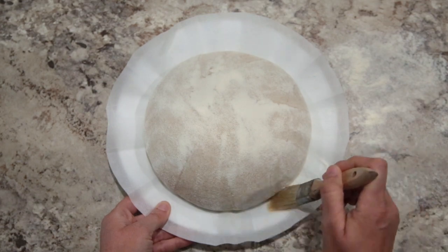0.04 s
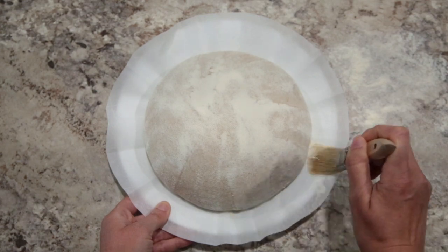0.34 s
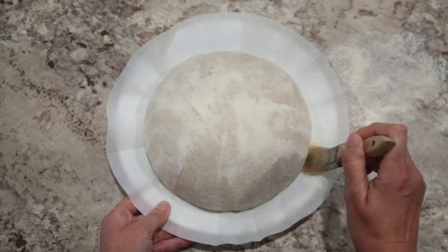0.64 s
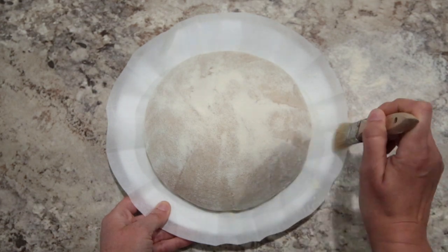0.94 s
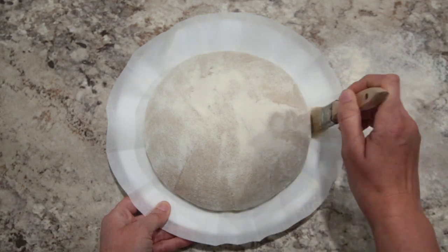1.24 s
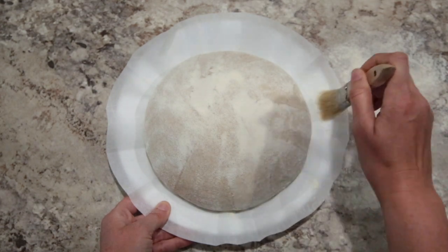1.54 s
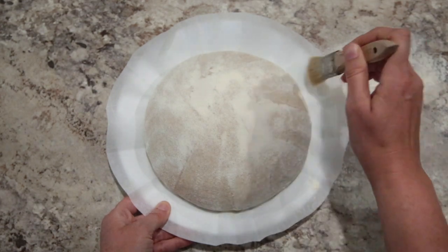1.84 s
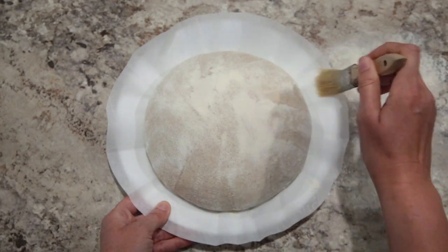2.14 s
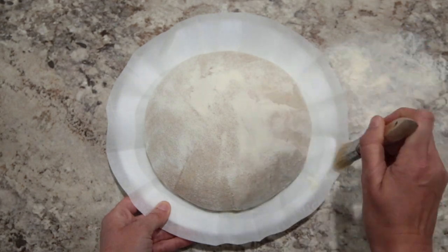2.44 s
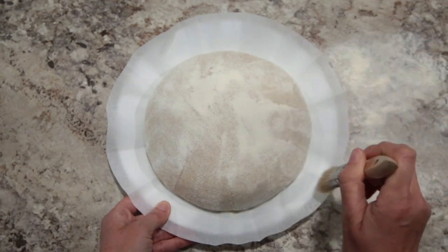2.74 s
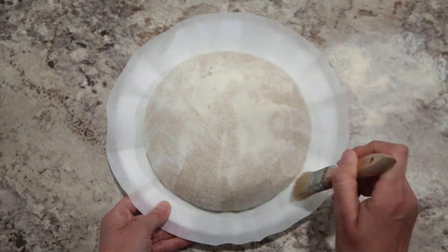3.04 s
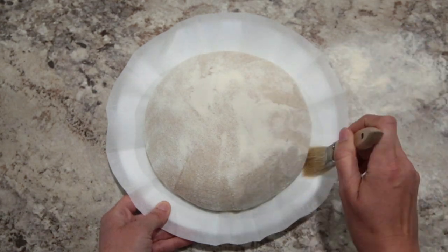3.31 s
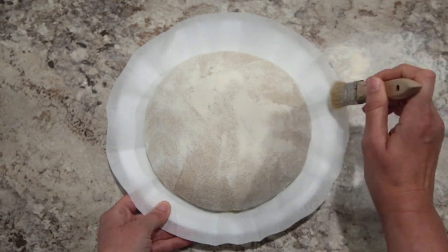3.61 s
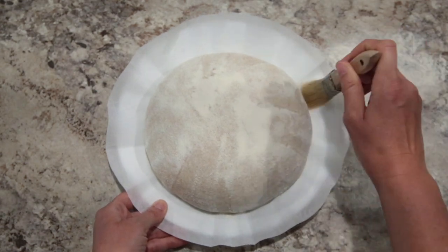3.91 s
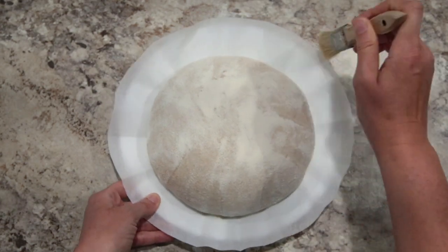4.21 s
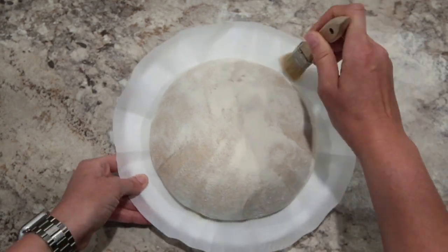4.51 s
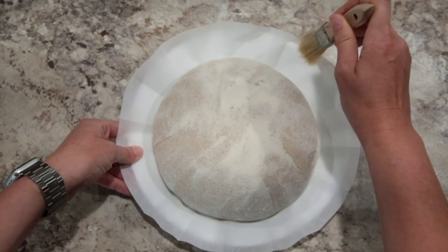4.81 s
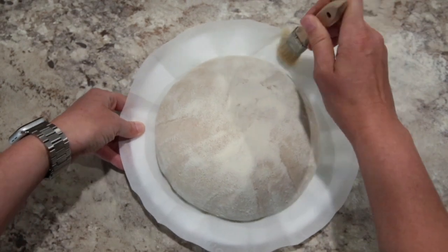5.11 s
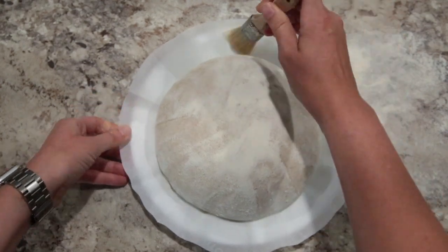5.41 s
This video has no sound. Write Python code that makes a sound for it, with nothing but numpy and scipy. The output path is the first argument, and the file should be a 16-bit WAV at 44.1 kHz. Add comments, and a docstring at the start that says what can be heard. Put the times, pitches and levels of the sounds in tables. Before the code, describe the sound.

A pastry brush sweeps loose flour across parchment paper on a kitchen counter, about five short, scratchy strokes a second. The bristles hiss and the stiff sheet rattles and ticks. Near the end the strokes grow a little louder as the paper is turned with a soft slide and rustle, and a deep rumble swells. It is heard close up in a small, hard room with a faint appliance hum.

```python
"""A pastry brush sweeps loose flour off a sheet of parchment on a kitchen counter, close up, in mono.
In each stroke the bristles land, drag and flick away: tiny slips that hiss and rattle the stiff paper.
The sheet ticks against the counter and is turned by hand near the end.
Around it: a small hard room, an appliance hum and a deep rumble that swells late."""
import sys
import numpy as np
from scipy import signal
from scipy.fft import rfft, irfft
from scipy.io import wavfile

SR = 44100
rng = np.random.default_rng(int(sys.argv[2]) if len(sys.argv) > 2 else 0)


def digitize_waveform(pressure):
    """Quantize a signal to 16-bit integers and store it at the path in sys.argv[1].

    Rows of a 2-D input are taken as channels; values are limited to [-1, 1].
    """
    field = np.atleast_2d(pressure).T
    bounded = np.clip(field, -1, 1)
    quanta = np.round(bounded * 32767).astype(np.int16)
    wavfile.write(sys.argv[1], SR, quanta)


N = 245195
SIZE = 4096  # filter length, samples
TIME_S = np.arange(N) / SR
FREQ_HZ = np.fft.rfftfreq(SIZE, 1 / SR)

# brush strokes: touch_s, attack_s, touch_to_flick_s, land_hiss_db, drag_hiss_db, flick_hiss_db,
# land_paper_vs_hiss_db, flick_paper_vs_hiss_db, bright_db
STROKES = [(-0.11, .01, .112, -36, -49.5, -37, -2, 0.5, -2.5),
           (0.018, 0.026, 0.11, -30, -31, -40, -0.5, 8.5, -2.5),
           (0.148, 0.0048, .332, -43.5, -43.5, -31, 9, 0, 0),
           (0.642, 0.024, .15, -31, -42.5, -50.5, -3, 8.5, 2),
           (0.880, 0.0067, .128, -28.5, -40.5, -48, -7.5, 8.5, -1),
           (1.094, .012, 0.13, -28.5, -44.5, -43.5, -3.5, 8, -1.5),
           (1.306, 0.018, 0.12, -28.5, -42.5, -39, -8.5, 4.5, -1),
           (1.525, 0.0095, .12, -27.5, -41.5, -38, -1, 1.5, -3),
           (1.736, 0.015, .12, -29.5, -36.5, -38.5, -3, 7.5, 0.5),
           (1.942, 0.017, .121, -27.5, -37, -34.5, -7.5, 7, -0.5),
           (2.129, 0.02, 0.1, -31, -37, -33, -3.5, 6, -0.5), (2.396, 0.022, 0.12, -30, -45, -40, 2.5, 3, 0),
           (2.645, 0.0079, 0.1, -27, -44, -34.5, -6, 10, 2.5),
           (2.904, 0.015, 0.11, -30.5, -40.5, -39, -4.5, 12, 4.5),
           (3.145, 0.008, 0.11, -31.5, -38.5, -40, 1, 5.5, 2),
           (3.354, 0.012, 0.099, -27, -38.5, -39, -3, 2, 1.5),
           (3.537, 0.018, 0.13, -25, -40.5, -49, -8.5, 6, 0),
           (3.734, .011, 0.13, -26.5, -39, -41, -6.5, 5.5, -3),
           (3.920, 0.019, 0.14, -25.5, -36.5, -39, -8, 3, -1.5),
           (4.124, 0.021, 0.11, -27.5, -35, -34, -4.5, 7.5, -1.5),
           (4.334, .018, 0.12, -27.5, -36, -36, -1.5, 9.5, -4),
           (4.558, 0.023, 0.13, -23.5, -35, -36, -7.5, -0.5, -5),
           (4.763, 0.018, 0.13, -24.5, -36.5, -36.5, -7, 3.5, -0.5),
           (4.960, 0.023, 0.13, -23.5, -32.5, -32, -5, 1, -2.5),
           (5.156, .022, .116, -25.5, -34, -35, -3.5, 8.5, -3),
           (5.466, .015, 0.099, -29.5, -36.5, -29, 0.5, 6, -0.5)]


def brush(paper, crackle_db=-7, tuft_s=0.0013, flutter_db=3.0):
    """Bristles on flour: coarse slips shake the sheet, fine ones hiss, a few crackle."""
    # spectra of the hiss, its top octave and a tip flicking a grain: freq_hz, gain_db
    hiss_points = [(300, -24.5), (1000, -10), (2000, -10), (3200, -9), (4200, 0.5), (5000, -1), (6000, -3),
                   (8400, 1), (9500, -4), (12000, -14)]
    top_points = [(4000, -63), (7500, -38), (9200, -0.5), (10500, -1), (12500, 3), (16000, -2.5)]
    crackle_points = [(800, -36), (2000, 3), (4500, 2), (9000, -5), (16000, 8)]
    hiss, top, crackle = shape(hiss_points), shape(top_points), shape(crackle_points)
    out = np.zeros(N)
    for t, push, paper_db, hiss_db, top_db in [*stroke_pushes(), *rustle_pushes()]:
        tufts = wander((t - t[0]) / tuft_s)  # bristles let go in tufts
        force = push * unit(undb(flutter_db * tufts))
        coarse = slips(len(t), rate_hz=2600, spread_db=5)
        fine = slips(len(t), rate_hz=15000, spread_db=4)
        finest = slips(len(t), rate_hz=15000, spread_db=4)
        sparse = slips(len(t), rate_hz=300, spread_db=4)
        spot = spot_colour(depth_db=1.6)
        layers = [(coarse, paper + spot / 2, paper_db),
                  (fine, hiss, hiss_db),
                  (finest, top, hiss_db + top_db),
                  (sparse, crackle, hiss_db + top_db / 2 + crackle_db)]
        for clicks, colour, level_db in layers:
            add(out, t[0], undb(level_db) * signal.fftconvolve(force * clicks, response(colour + spot)))
    return out


def stroke_pushes(land_top_db=-4.5, drag_top_db=-0.5, flick_top_db=4, drag_after_s=0.075, bend_db=1):
    """Four pushes a stroke; yields times_s, strength, paper_db, hiss_db, top_vs_hiss_db."""
    for (touch_s, attack_s, length_s, land_db, drag_db, flick_db,
         land_paper_db, flick_paper_db, bright_db) in STROKES:
        # bite: first tips meet the sheet, weaker for a slow attack
        bite_db = land_db - 6.5 - 450 * attack_s
        t, push = swell(touch_s + 0.0032, rise_s=0.0016, hold_s=0, fall_s=0.0053)
        yield t, push, bite_db - 11.5, bite_db, land_top_db + bright_db
        # landing: tips hit and splay, dark hiss
        t, push = swell(touch_s + attack_s, rise_s=attack_s / 2, hold_s=0.0038, fall_s=0.015)
        yield t, push * (t > touch_s), land_db + land_paper_db, land_db, land_top_db + bright_db
        # drag: bristles glide, louder as they bend; the sheet barely stirs
        glide_s = max(length_s - drag_after_s, 0)
        t, push = swell(touch_s + drag_after_s, rise_s=0.022, hold_s=glide_s, fall_s=0.013)
        progress = np.clip((t - touch_s) / length_s, 0, 1)
        bend = undb(bend_db * (progress ** 2 - 0.5))
        yield t, push * bend, drag_db - 7, drag_db, drag_top_db + bright_db
        # flick: bristles spring free; times halve per 17.5 dB more rattle
        rattle_db = flick_db + flick_paper_db
        stretch = 2 ** ((-32 - rattle_db) / 17.5)
        t, push = swell(touch_s + length_s, rise_s=0.016 * stretch, hold_s=0, fall_s=0.013 * stretch)
        yield t, push, rattle_db, flick_db, flick_top_db + bright_db


def slips(samples, rate_hz, spread_db):
    """Bristles catch and let go: random clicks of uneven size, rms 1."""
    happens = rng.random(samples) < rate_hz / SR
    size = undb(spread_db * np.clip(rng.standard_normal(samples), -2, 2))
    return unit(happens * size * rng.choice([-1, 1], samples) + 1e-9)


def paper_spectrum():
    """What the rubbed or struck sheet radiates, in dB."""
    # broad colour: freq_hz, gain_db
    paper_points = [(100, -13), (350, -17.5), (550, -15), (800, -11), (1150, -6.5), (1600, -1.5),
                    (2050, 3.5), (2400, -4), (3100, -11), (4200, -14), (6000, -20), (12000, -34)]
    # resonances: centre_hz, width_hz, boost_db
    modes = [(1708, 230, 3), (1870, 640, -0.5), (2510, 42, 2), (2815, 150, 4), (4000, 148, 3.5)]
    peaks = sum(db / (1 + (2 * (FREQ_HZ - hz) / width_hz) ** 2) for hz, width_hz, db in modes)
    return shape(paper_points) + peaks


def spot_colour(depth_db, step_hz=600):
    """Each spot on the sheet has its own random spectral ripple."""
    return depth_db * 1.23 * wander(FREQ_HZ / step_hz)  # 1.23 brings the spread near 1


def ticks(paper, knock_gain_db=20.5, snap_gain_db=22, buckle_s=0.0004, chatter_s=0.0048, thin_hz=600):
    """A crease gives way and chatters on: a knock through the sheet plus a bright snap."""
    # buckles and slaps on the counter: start_s, knock_db, snap_db
    buckles = [(0.0995, -27, -26), (0.1533, -32, -17.5), (0.1616, -30, -22.5), (0.313, -27.5, -32),
               (0.3357, -28.5, -29.5), (0.3552, -33, -35), (0.4763, -25, -27), (0.5008, -21.5, -22),
               (0.5126, -22, -27), (0.5544, -33, -37), (0.8049, -33, -40), (0.8947, -37, -23.5),
               (1.1737, -32.5, -43), (1.2234, -33, -26.5), (1.2457, -25.5, -35), (1.4972, -41, -50),
               (1.552, -44, -24), (1.677, -24, -45), (1.751, -24, -32), (1.8938, -31, -42),
               (2.0453, -30, -23.5), (2.103, -33, -36), (2.134, -25, -29.5), (2.2533, -16.5, -45),
               (2.2599, -47, -27), (2.421, -25.5, -46), (2.7463, -33.5, -23), (2.7693, -27, -32),
               (2.7779, -21.5, -28.5), (2.7813, -25.5, -48), (3.0313, -26.5, -47), (3.1537, -24.5, -53),
               (3.4399, -17.5, -24), (3.488, -18.5, -27), (3.806, -41, -21.5), (3.8097, -20.5, -51),
               (3.8546, -58, -25.5), (4.1431, -25.5, -52), (4.2282, -33, -17), (4.2693, -23.5, -27),
               (4.3685, -43, -20), (4.4468, -18.5, -28), (4.4637, -25, -46), (4.502, -29, -20.5),
               (4.5486, -27, -49), (4.677, -25, -25.5), (4.712, -27, -29), (4.758, -48, -46),
               (4.8718, -23.5, -31.5), (4.8816, -21.5, -25), (4.9332, -27, -28.5), (5.0816, -35, -21.5),
               (5.1204, -22.5, -25), (5.2228, -19, -34), (5.2537, -21, -20), (5.3057, -29, -31)]
    # crease snap spectrum: freq_hz, gain_db
    snap_points = [(500, -4), (2500, 2.5), (4300, 12), (6500, 3.5), (10000, 1.5), (16000, -1)]
    snap = shape(snap_points)
    # a small patch radiates little bass
    knock = paper - 10 * np.log10(1 + (thin_hz / (FREQ_HZ + thin_hz / 10)) ** 2)
    t = np.arange(SIZE // 4) / SR
    envelope = np.exp(-t / buckle_s) + 0.49 * np.exp(-t / chatter_s)
    out = np.zeros(N)
    for start_s, knock_db, snap_db in [*buckles, *stray_ticks()]:
        spectrum = rfft(rng.choice([-1, 1], len(t)) * envelope, SIZE)
        blow = irfft(spectrum / np.sqrt(np.abs(spectrum) + 1e-9))[:len(t)]  # partly whitened
        spot = spot_colour(depth_db=1.5)
        for colour, level_db in (knock, knock_db + knock_gain_db), (snap, snap_db + snap_gain_db):
            ring = signal.fftconvolve(blow, response(colour + spot))
            add(out, start_s, undb(level_db) * ring / np.linalg.norm(ring))
    return out


def stray_ticks(scatter_s=0.018, scatter_db=3):
    """One faint tick near each flick; yields start_s, knock_db, snap_db."""
    for touch_s, _, length_s, _, _, flick_db, _, flick_paper_db, _ in STROKES:
        late, knock, snap = rng.standard_normal(3)
        yield (touch_s + length_s + scatter_s * late,
               flick_db + flick_paper_db - 8 + scatter_db * knock,
               flick_db - 3 + scatter_db * snap)


def rustle_pushes():
    """The sheet rustles as it is moved; yields the same fields as stroke_pushes."""
    # rustles: full_s, rise_s, hold_s, fall_s, paper_db, hiss_db, top_vs_hiss_db
    rustles = [(0.548, 0.011, 0.0066, 0.0036, -37, -46.5, -10), (4.46, 0.042, 0.82, 0.032, -43, -47, -11),
               (5.121, .008, .005, 0.042, -37, -42, -9), (5.212, 0.0023, .01, 0.0044, -31.5, -34, -4)]
    for full_s, rise_s, hold_s, fall_s, *levels_db in rustles:
        yield (*swell(full_s, rise_s, hold_s, fall_s), *levels_db)


def turning(bump_s=4.3705, bump_hz=245, bump_decay_s=0.00303, bump_db=-23):
    """The sheet shifts on the counter; later the hand bumps it and drags it round."""
    # sliding level: time_s, level_db
    slide_levels = [(0, -54), (.45, -76), (.58, -47.5), (.72, -76), (4.25, -78), (4.45, -49.5), (4.6, -43),
                    (4.8, -46.5), (5.2, -59), (5.35, -55), (5.56, -56)]
    # sliding spectrum: freq_hz, gain_db
    slide_points = [(60, -11), (170, -19), (310, -0.5), (480, -7), (750, -13), (1500, -25), (5000, -67)]
    out = curve(slide_levels) * noise(slide_points)
    t = np.arange(SIZE) / SR
    add(out, bump_s, undb(bump_db) * np.sin(2 * np.pi * bump_hz * t) * np.exp(-t / bump_decay_s))
    return out


def ceiling(x, delay_s=0.00894, echo_db=-16, lowpass_hz=6000):
    """One slap from the ceiling, 1.5 m above the counter, combs the sound."""
    echo = np.zeros(N)
    dull = signal.sosfilt(signal.butter(1, lowpass_hz, fs=SR, output="sos"), x)
    add(echo, delay_s, undb(echo_db) * dull)
    return echo


def room(x, t60_s=0.44, predelay_s=0.0117):
    """Walls and cupboards return a short, duller, diffuse tail."""
    # tail spectrum: freq_hz, gain_vs_direct_db
    tail_points = [(100, -11.5), (1000, -11), (2300, -13), (4500, -10), (9000, -14.5), (16000, -18.5)]
    tail_db = shape(tail_points)
    t = np.arange(SR // 2) / SR
    tail = rng.standard_normal(len(t)) * np.exp(-np.log(1000) * t / t60_s) * (t > predelay_s)
    colour = response(tail_db) * np.sqrt(np.mean(undb(tail_db) ** 2))
    impulse = signal.fftconvolve(tail / np.linalg.norm(tail), colour)
    return signal.fftconvolve(x, impulse)[:N]


def kitchen(air_db=-51, waver_hz=7):
    """Still air, a wavering appliance hum and a deep rumble."""
    # air and rumble spectra: freq_hz, gain_db
    air_points = [(25, -25), (45, -28), (65, -9), (90, -4.5), (140, -3), (220, -5), (350, -0.5),
                  (550, -11.5), (1000, -15.5), (2000, -16.5), (5000, -18.5), (16000, -33.5)]
    rumble_points = [(20, -28), (29, -2), (39, -7), (55, -10), (110, -55), (400, -67)]
    # rumble swell: time_s, level_db
    rumble_levels = [(0, -90), (3.8, -67), (4.5, -65), (5.1, -56), (5.4, -45), (5.56, -45)]
    # hum partials: pitch_hz, level_db
    hum_partials = [(63.8, -64.5), (122, -67.5), (312.3, -63.5)]
    out = undb(air_db) * noise(air_points) + curve(rumble_levels) * noise(rumble_points)
    for pitch_hz, level_db in hum_partials:
        waver = 1 + wander(TIME_S * waver_hz)
        drift_rad = wander(TIME_S * waver_hz)
        out += undb(level_db) * np.sqrt(2) * waver * np.sin(2 * np.pi * pitch_hz * TIME_S + drift_rad)
    return out


def swell(full_s, rise_s, hold_s, fall_s):
    """Times and strength of a push: Gaussian rise, hold, Gaussian fall."""
    t = np.arange(-int(3 * rise_s * SR) - 1, int((hold_s + 3 * fall_s) * SR) + 2) / SR
    rising = np.minimum(t, 0) / rise_s
    falling = np.maximum(t - hold_s, 0) / fall_s
    return full_s + t, np.exp(-0.5 * (rising ** 2 + falling ** 2))


def undb(db):
    """Decibels to gain."""
    return 10 ** (np.asarray(db) / 20)


def unit(x):
    """Scale to rms 1."""
    return x / np.sqrt(np.mean(x ** 2))


def add(track, start_s, sound):
    """Mix a sound into a track."""
    start = int(round(start_s * SR))
    lo, hi = max(start, 0), min(start + len(sound), N)
    if hi > lo:
        track[lo:hi] += sound[lo - start:hi - start]


def wander(steps):
    """Random values at whole steps, joined by lines."""
    return np.interp(steps, np.arange(SIZE), rng.standard_normal(SIZE))


def shape(points):
    """Spectrum in dB from (freq_hz, gain_db) points, joined over log frequency."""
    hz, db = np.transpose(points)
    return np.interp(np.log(FREQ_HZ + 1), np.log(hz), db)


def response(spectrum_db):
    """Minimum-phase impulse response of unit energy."""
    cepstrum = irfft(spectrum_db * np.log(10) / 20)
    cepstrum[1:SIZE // 2] *= 2
    cepstrum[SIZE // 2 + 1:] = 0
    impulse = irfft(np.exp(rfft(cepstrum)))
    return impulse / np.linalg.norm(impulse)


def noise(points):
    """Steady coloured noise, rms 1."""
    white = rng.standard_normal(N + SIZE)
    return unit(signal.fftconvolve(white, response(shape(points)))[SIZE:SIZE + N])


def curve(rows):
    """Gain over time from (time_s, level_db) rows."""
    return undb(np.interp(TIME_S, *np.transpose(rows)))


def scene():
    """Brush and paper in the kitchen, the same in both channels."""
    paper = paper_spectrum()
    direct = brush(paper) + ticks(paper) + turning()
    mono = direct + ceiling(direct) + room(direct) + kitchen()
    return np.array([mono, mono])


def record(dry):
    """Cut the deepest bass and the top."""
    highpass_hz, lowpass_hz = 33, 15950
    no_bass = signal.sosfilt(signal.butter(6, highpass_hz, "high", fs=SR, output="sos"), dry)
    return signal.sosfilt(signal.ellip(12, 0.1, 70, lowpass_hz, fs=SR, output="sos"), no_bass)


dry = scene()
out = record(dry)
digitize_waveform(out)
```